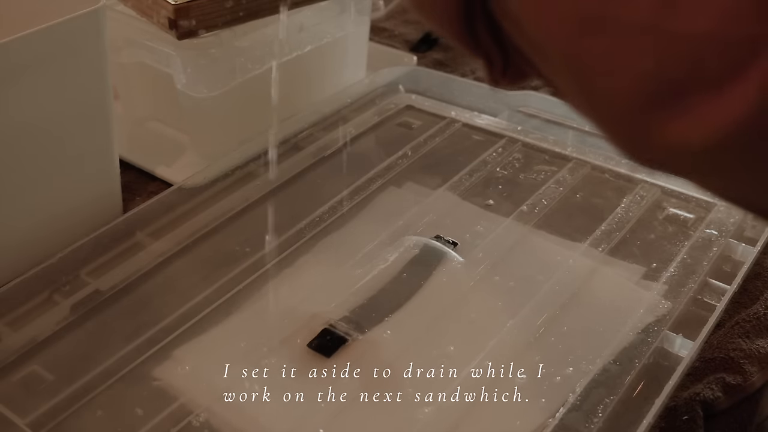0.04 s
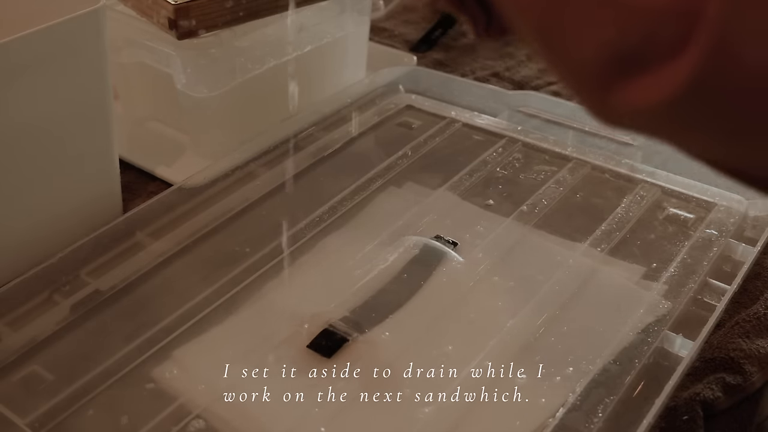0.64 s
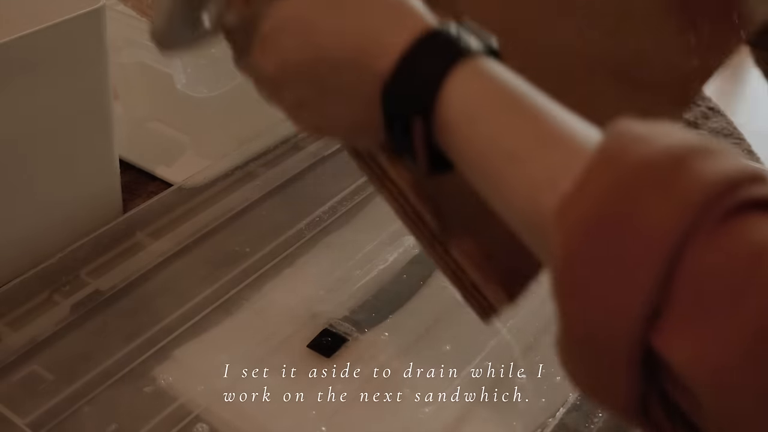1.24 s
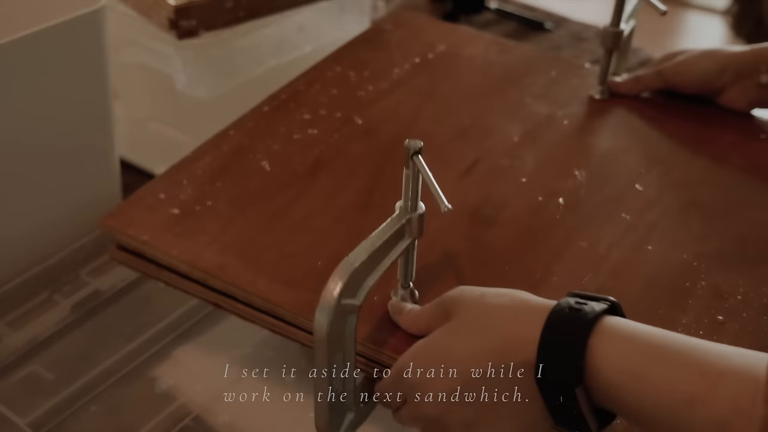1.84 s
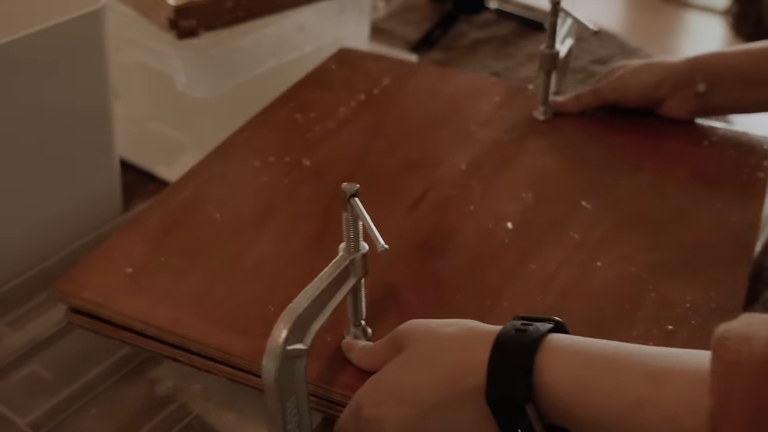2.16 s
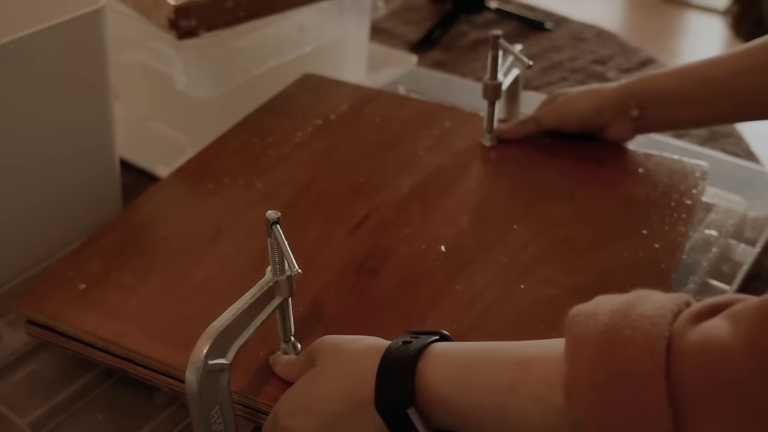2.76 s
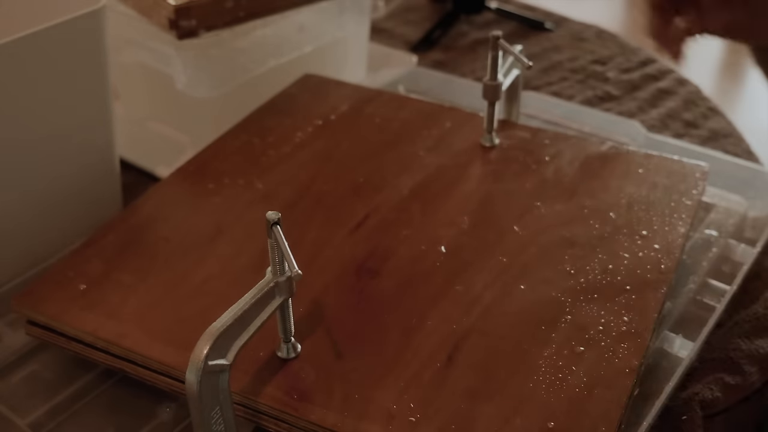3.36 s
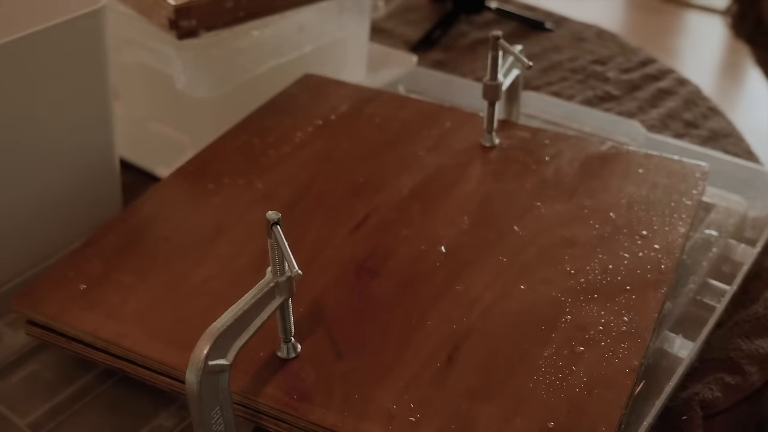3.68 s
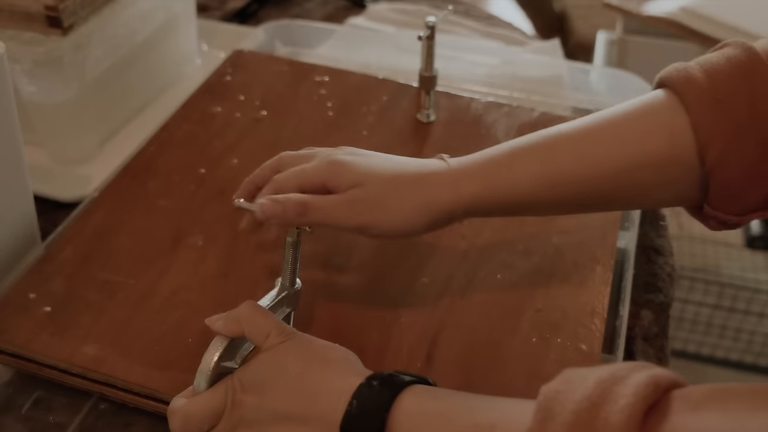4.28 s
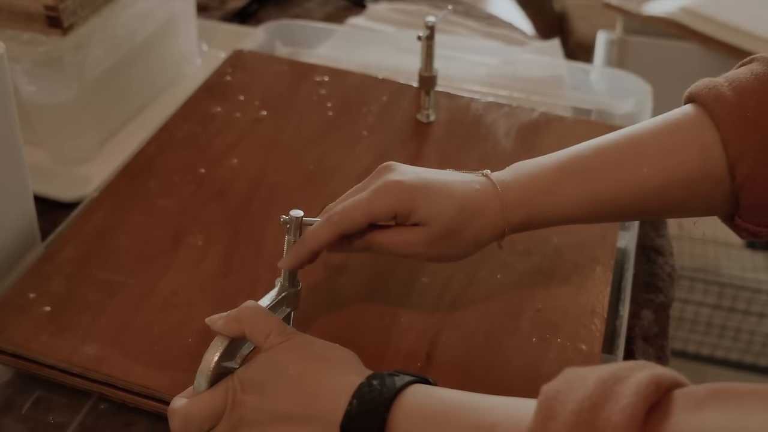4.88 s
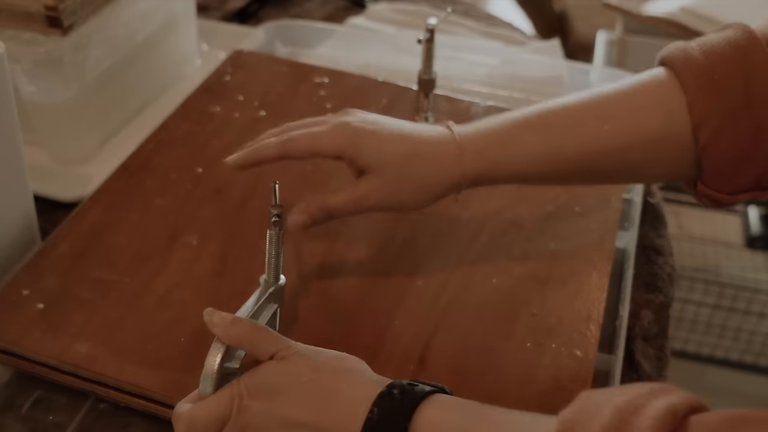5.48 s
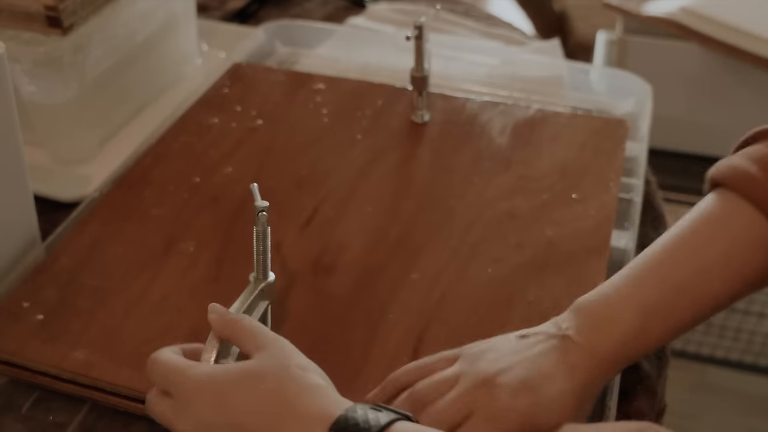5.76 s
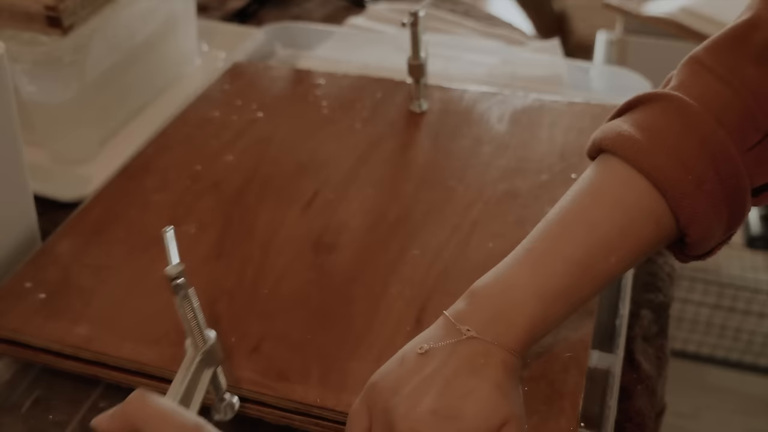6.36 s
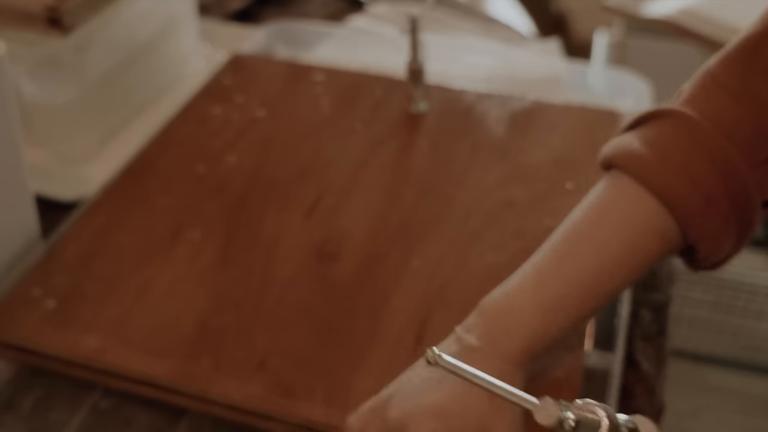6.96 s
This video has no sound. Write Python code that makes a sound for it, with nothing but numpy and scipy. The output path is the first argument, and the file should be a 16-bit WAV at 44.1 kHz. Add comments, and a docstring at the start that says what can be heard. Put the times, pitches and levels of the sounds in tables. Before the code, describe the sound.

Water patters into a plastic tray and stops, then a wooden board knocks down and a metal clamp is unscrewed and clatters off.

```python
"""Water runs off a wet stack, patters into a plastic tray and thins out: drops drum on the plastic,
splash in the puddle and trap ringing bubbles. A wooden press board held by steel clamps is set down
on the tray and knocks as it settles. A clamp screw is turned loose in gritty slips; the clamp knocks,
judders off the board's edge and is put down.
Heard in a small, lively workshop, on a closely spaced microphone pair."""
import sys
import numpy as np
from scipy import signal
from scipy.fft import rfft, irfft, next_fast_len
from scipy.io import wavfile
from scipy.ndimage import uniform_filter1d

SR = 44100
rng = np.random.default_rng(int(sys.argv[2]) if len(sys.argv) > 2 else 0)


def digitize_waveform(pressure):
    """Quantize a signal to 16-bit integers and store it at the path in sys.argv[1].

    Rows of a 2-D input are taken as channels; values are limited to [-1, 1].
    """
    field = np.atleast_2d(pressure).T
    bounded = np.clip(field, -1, 1)
    quanta = np.round(bounded * 32767).astype(np.int16)
    wavfile.write(sys.argv[1], SR, quanta)


N = 318843
WATER_SAMPLES = 2 * SR  # the water has stopped by then

# resonances of the plastic tray: pitch_hz, width_hz, level_db
TRAY_MODES = [(289, 42, 18.5), (339, 23, 14.5), (425, 110, 0.5), (585, 59, 5), (855, 120, -9),
              (1160, 93, -18.5), (2200, 550, -42)]
# drops that land in the puddle: start_s, level_db, centre_hz
PUDDLE_DROPS = [(.005, -51, 13700), (0.0339, -47, 8500), (0.0406, -51, 8600), (0.0817, -54, 8900),
                (0.26, -50.5, 9400), (0.2948, -49.5, 4940), (0.306, -53, 6000), (.321, -51, 11900),
                (0.3632, -61, 6460), (.387, -60, 9000), (.538, -64, 10000), (0.4336, -49.5, 4600),
                (0.4514, -42.5, 10400), (0.479, -63, 10900), (0.4976, -55, 8900), (0.578, -50.5, 9550),
                (0.7, -52, 12400), (0.7303, -51, 8800), (0.759, -48, 9600), (0.7655, -65, 9500),
                (0.786, -66, 10300), (1.059, -66, 12600), (1.085, -60, 8900), (1.104, -58, 6460),
                (1.294, -66, 13300), (1.353, -64, 12400), (1.372, -62, 6000)]
# strength of the stream as it runs dry: time_s, flow_db
STREAM_FLOW = [(0, 1.5), (.23, -3), (.5, -0.5), (.8, -5.5), (1.02, -2), (1.16, -10.5), (1.29, -12),
               (1.4, -22), (1.6, -5.5)]


def amp(db):
    """Decibels as an amplitude factor."""
    return 10 ** (np.asarray(db) / 20)


def unit(x):
    """x scaled to rms 1."""
    return x / np.sqrt(np.mean(x ** 2) + 1e-20)


def burst(x):
    """A short sound scaled to the energy of 10 ms at rms 1."""
    return x / np.sqrt(np.sum(x ** 2) / len(x) / (SR / 100))


def along(points, hz):
    """A curve of (freq_hz, value) points, read on a log frequency axis."""
    freqs, values = np.transpose(points)
    return np.interp(np.log(hz + 1), np.log(freqs + 1), values)


def hump(hz, centre_hz, octaves=0.42):
    """A bell of height 1 around one pitch."""
    return np.exp(-(np.log2((hz + 1) / centre_hz) / octaves) ** 2)


def add(track, s, sound):
    """Mix a sound in at time s."""
    part = track[..., max(round(s * SR), 0):][..., :sound.shape[-1]]
    part += sound[..., :part.shape[-1]]


def filtered(x, response):
    """x through a complex frequency response."""
    size = next_fast_len(x.shape[-1] + min(x.shape[-1] // 4, SR // 10), True)
    return irfft(rfft(x, size) * response(np.fft.rfftfreq(size, 1 / SR)), size)[..., :x.shape[-1]]


def shaped(x, spectrum):
    """x through a curve of (freq_hz, gain_db) points."""
    return filtered(x, lambda hz: amp(along(spectrum, hz)))


def coloured(x, db_of_hz, size=4096):
    """x through a causal, minimum-phase filter with the given dB curve."""
    cepstrum = irfft(np.log(amp(db_of_hz(np.fft.rfftfreq(size, 1 / SR))) + 1e-6))
    cepstrum[1:size // 2] *= 2
    cepstrum[size // 2 + 1:] = 0
    impulse = irfft(np.exp(rfft(cepstrum)))
    return signal.fftconvolve(x, impulse[None], axes=1)[:, :x.shape[1]]


def resonant(x, modes):
    """x through (pitch_hz, width_hz, level_db) resonances."""
    return filtered(x, lambda f: sum(amp(db) * 1j * f * width / (hz * hz - f * f + 1j * f * width)
                                     for hz, width, db in modes))


def even(x, bins=21):
    """A short burst with its broad spectral humps and holes levelled out."""
    power = np.abs(uniform_filter1d(np.mean(np.abs(rfft(x)) ** 2, axis=0), bins))
    hz = np.fft.rfftfreq(x.shape[1], 1 / SR)
    levelling_db = lambda f: -10 * np.log10(np.interp(f, hz, power / power.mean()) + .02)
    return burst(coloured(x, levelling_db, size=1024))


def swells(rows):
    """Bell-shaped envelopes from (centre_s, level_db, length_s) rows."""
    t = np.arange(N) / SR
    coarse = t[::64]
    bells = sum(amp(db) * np.exp(-2 * ((coarse - s) / length * 2) ** 2) for s, db, length in rows)
    return np.interp(t, coarse, bells)


def pushes(rows, t, rise_s=0.0015, release_s=0.028):
    """Envelopes that bite, hold and let go, from (start_s, level_db, length_s) rows."""
    return sum(amp(db) * np.interp(t, s + np.cumsum([0, rise_s, length, release_s]), [0, 1, 1, 0])
               for s, db, length in rows)


def grains(per_s, spread_db):
    """Impulses at random times with random sizes and directions."""
    hits = rng.random(N) < per_s / SR
    size = hits * amp(spread_db * np.clip(rng.standard_normal(N), -2, 2)) * rng.choice([-1, 1], N)
    pan = rng.uniform(-0.083, 0.12, N)
    return size * np.array([1 + pan, 1 - pan])


def diffuse(size):
    """Noise from all sides: alike at both microphones in the bass, unrelated in the treble."""
    # stereo width of diffuse sound: freq_hz, side_to_mid_db
    width = [(40, -34), (150, -20.5), (350, -14), (700, -8.5), (1400, -4.5), (2800, 0.5), (15000, -1.5)]

    def shares(hz):
        side_gain = amp(along(width, hz))
        return np.array([np.ones_like(hz), side_gain]) / np.hypot(1, side_gain)
    mid, side = filtered(rng.standard_normal((2, size)), shares)
    return np.array([mid + side, mid - side])


def in_room(x, wet_db, build_s=0.00039):
    """The direct sound and the workshop's tail, in which each frequency dies at its own speed."""
    # reverberation time of the workshop: freq_hz, t60_s
    decay = [(100, 0.44), (400, 0.63), (1100, 0.66), (4000, 0.72), (9000, 0.42), (16000, 0.45)]
    # strength of the walls' answer: freq_hz, gain_db
    walls = [(100, 2), (300, -2), (600, 3), (1050, 1), (2000, 0), (5000, 1), (9000, 6.5), (15000, 6.5)]
    hz, t, spectra = signal.stft(diffuse(SR // 2), SR, nperseg=256)
    spectra = spectra * amp(-60 * t / along(decay, hz)[:, None]) * (1 - np.exp(-t / build_s))
    tail = signal.istft(spectra, SR, nperseg=256)[1]
    response = amp(wet_db) * coloured(tail / np.linalg.norm(tail[0]), lambda f: along(walls, f))
    response[:, 0] += 1  # the direct path
    return signal.fftconvolve(x, response, axes=1)


def room_tone(floor_db=-60):
    """Steady rumble and hiss with a faint, wavering hum; the hiss swells twice."""
    # spectrum of the quiet workshop: freq_hz, density_db
    floor = [(18, -30), (25, -38), (33, -37), (45, -33), (62, -21), (88, -6), (112, -19), (165, -12.5),
             (260, -13.5), (400, -17.5), (560, -19), (1000, -23), (2000, -27.5), (3800, -32), (5500, -31.5),
             (11000, -36.5), (16000, -42)]
    # narrow bands of hum: pitch_hz, level_db
    hum_bands = [(45, -62.5), (139, -67.5)]
    # soft swells of hiss: centre_s, level_db, length_s
    swishes = [(3.66, -62, 0.71), (5.77, -59.5, 0.16)]
    air = unit(shaped(diffuse(N), floor))
    hum = sum(amp(db) * unit(resonant(rng.standard_normal(N), [(hz, 6, 0)])) for hz, db in hum_bands)
    hiss = unit(shaped(rng.standard_normal((2, N)), [(500, 1), (3000, -2), (11000, -3.5), (16000, -10)]))
    return amp(floor_db) * air + hum + swells(swishes) * hiss


def grip(rise_s=0.00094, t60_s=0.062):
    """A soft hand wakes only one low mode of the board."""
    # bumps of the hand on the board: start_s, pitch_hz, level_db
    bumps = [(3.817, 323, -32.5), (3.847, 347, -40), (6.822, 315, -44.5), (7.013, 330, -37)]
    out, t = np.zeros((2, N)), np.arange(SR // 5) / SR
    for s, hz, db in bumps:
        envelope = amp(db - 60 * t / t60_s) * (1 - np.exp(-t / rise_s))
        add(out, s, envelope * np.sin(2 * np.pi * hz * t))
    return in_room(out, wet_db=-6)[:, :N]


def clack(hz, rattle_t60_s=0.026, board_db=-13, width_ratio=0.76):
    """A tiny rattle rings one broad resonance, with a little of the board below it."""
    t = np.arange(SR // 16) / SR
    rattle = even(diffuse(len(t)) * amp(-60 * t / rattle_t60_s))
    body = [(hz, hz * width_ratio, 0), (750, 400, board_db)]
    ring = resonant(resonant(rattle, body), body)
    return burst(coloured(ring, lambda f: -10 * np.log10(1 + (f / (1.4 * hz)) ** 8)))


def ticks():
    """Small ticks: light steel ticks as the clamps are moved, and one faint, dry, high click."""
    # small ticks: start_s, level_db, ring_hz
    small_ticks = [(1.819, -60, 1800), (3.43, -61, 8600), (5.225, -53, 1570), (5.2996, -57, 930),
                   (5.405, -61, 2190), (5.7778, -51.5, 1670), (6.2315, -51, 5800), (6.237, -38, 2060),
                   (6.241, -53, 6100), (6.261, -47, 1670), (6.817, -58.5, 1700), (6.829, -51.5, 1620),
                   (7.029, -43, 1620)]
    out = np.zeros((2, N))
    for s, db, hz in small_ticks:
        add(out, s, amp(db) * clack(hz))
    return in_room(out, wet_db=-3)[:, :N]


def handle(contacts_per_s=2500, waver_hz=130):
    """The loose handle scrapes through its hole and sings a thin, wavering note."""
    # slides of the handle: centre_s, level_db, length_s, ring_hz, scrape_db
    slides = [(3.883, -62, 0.014, 10000, 5.5), (3.896, -62, 0.022, 9700, 0), (4.467, -68, 0.008, 9800, 4),
              (4.492, -62.5, 0.015, 9700, 0), (4.512, -70, 0.018, 9930, -8), (5.55, -66, 0.012, 9500, 10),
              (6.205, -65, 0.019, 9800, 7), (6.245, -51.5, 0.008, 9680, 13), (6.272, -49.5, 0.02, 9600, -6),
              (6.273, -50, 0.022, 5710, -10), (6.386, -62.5, 0.036, 6950, 8)]
    # spectrum of its scrape: freq_hz, density_db
    scrape_spectrum = [(1000, -30), (3500, 1), (6000, -3), (8600, -7), (11000, -14), (16000, -21)]
    out, t = np.zeros((2, N)), np.arange(SR // 5) / SR
    for s, db, length, ring_hz, scrape_db in slides:
        contacts = rng.standard_normal((2, len(t))) * (rng.random(len(t)) < contacts_per_s / SR)
        scrape = unit(shaped(contacts, scrape_spectrum))
        unsteady = unit(filtered(rng.standard_normal(len(t)), lambda hz: hz < 400))
        phase = 2 * np.pi * np.cumsum(ring_hz + waver_hz * unsteady) / SR
        ring = unit(np.sin(phase + rng.uniform(-1.1, 1, (2, 1))))
        envelope = amp(db) * np.exp(-2 * (2 * (t / length - 2)) ** 2)
        add(out, s - 2 * length, envelope * (ring + amp(scrape_db) * scrape))
    return in_room(out, wet_db=-7)[:, :N]


def screw(thread_db=1, rub_db=3.5, rasp_db=-3, catches_per_s=95, slip_s=0.0038):
    """Steel catches and slips: each turn rings the frame at its own pitch, rubs on wood are duller."""
    # spectrum of the slipping thread: freq_hz, density_db
    thread = [(150, -6.5), (250, -1), (312, 4.5), (455, -2), (650, -7.5), (1350, -4), (2200, -10.5),
              (3100, -21), (5920, -28.5), (9100, -50), (15400, -120)]
    # resonances of screw and frame: pitch_hz, width_hz, level_db
    rasp_modes = [(700, 250, 1), (844, 87, -5), (950, 56, -6), (1170, 63, -5), (1317, 60, -2),
                  (1880, 90, -3.5), (1980, 80, -5), (2220, 66, -4)]
    # turns of the screw: start_s, level_db, length_s, pitch_hz, lift_db
    turns = [(3.87, -52.5, 0.028, 1540, 4), (4.074, -55, 0.06, 2200, 0), (4.25, -55.5, 0.046, 1100, 4),
             (4.383, -54.5, 0.019, 1950, 0), (4.437, -53, 0.017, 720, 0), (4.452, -59, 0.013, 1970, 8),
             (4.479, -56.5, 0.017, 1350, 14), (4.571, -55.5, 0.0074, 800, 10), (4.661, -54, 0.03, 700, 4)]
    # the loose clamp rubs on the board: start_s, level_db, length_s
    rubs = [(5.55, -58, 0.014), (6.195, -56, 0.022), (6.28, -55, 0.051), (6.35, -49, 0.031),
            (6.96, -58, 0.062)]
    t = np.arange(N) / SR
    catches = np.r_[0, np.cumsum(rng.uniform(.4, 1.6, 1500)) / catches_per_s]
    since_catch = t - catches[np.searchsorted(catches, t, "right") - 1]
    grit = grains(per_s=4000, spread_db=1) * (.4 + np.exp(-since_catch / slip_s))
    slips = unit(shaped(grit, thread))
    rasp = slips + amp(rasp_db) * unit(resonant(slips, rasp_modes))
    out = amp(rub_db) * pushes(rubs, t) * slips
    for s, db, length, hz, lift_db in turns:
        span = slice(round(s * SR), round(s * SR) + SR // 6)
        turn = unit(coloured(rasp[:, span], lambda f: lift_db * hump(f, hz)))
        add(out, s, amp(thread_db) * pushes([(s, db, length)], t[span]) * turn)
    return in_room(out, wet_db=0)[:, :N]


def clinks(snap_t60_s=0.0018, snap_db=3):
    """Steel meets steel with a bright snap and the frame rings briefly in the hand."""
    # modes of the clamp's frame: pitch_hz, level_db, t60_s
    frame_modes = [(1980, 1.5, 0.04), (2600, -3.5, 0.067), (2800, -3, 0.07), (3900, -6, 0.045),
                   (4370, -1.5, 0.045), (5710, -15, 0.07)]
    # the screw strikes the frame: start_s, level_db
    strikes = [(6.235, -36.5), (6.2625, -41)]
    out, t = np.zeros((2, N)), np.arange(SR // 5) / SR
    hz, mode_db, t60 = np.transpose(frame_modes)[:, :, None, None]
    for s, db in strikes:
        phase = rng.normal(0, 0.66, (len(frame_modes), 2, 1))
        ring = np.sum(amp(mode_db - 60 * t / t60) * np.sin(2 * np.pi * hz * t + phase), axis=0)
        snap = rng.standard_normal((2, len(t))) * amp(snap_db - 60 * t / snap_t60_s)
        add(out, s, amp(db) * (ring + snap))
    return in_room(out, wet_db=-5)[:, :N]


def groan(pitch_hz=505, waver=0.019, overtone_db=-11):
    """Stick and slip lock on to one resonance of the board: a short, rough tone."""
    # groans under the dragging clamp: centre_s, level_db, length_s
    groans = [(6.3, -42, 0.014), (6.368, -36.5, 0.069)]
    unsteady = unit(filtered(rng.standard_normal(N), lambda hz: hz < 150))
    phase = 2 * np.pi * np.cumsum(pitch_hz * (1 + waver * unsteady)) / SR
    tone = swells(groans) * (np.sin(phase) + amp(overtone_db) * np.sin(2 * phase))
    return in_room(np.array([tone, tone]), wet_db=-20)[:, :N]


def flow_db(s):
    """Strength of the stream at times s; dry after the last point."""
    return np.interp(s, *np.transpose(STREAM_FLOW), right=-120)


def plink(hz, cycles, side):
    """A water film snaps and a tiny bubble rings, rising; the microphones hear it side cycles apart."""
    turn = hz * np.arange(SR // 125) / SR
    phase = 2 * np.pi * (turn * (1 + 0.022 * turn / cycles) + np.array([[0], [side]]))
    ring = np.sin(phase) * amp(-60 * turn / cycles) * (1 - np.exp(-2 * turn))
    snap = np.zeros_like(ring)
    snap[:, :3] = [1, -2, 1]
    return burst(burst(ring) + .3 * burst(snap))


def tap(bright_db, t60_s=0.04, roughness=0.11):
    """A drop taps the tray floor; a direct hit lifts the higher resonances by bright_db an octave."""
    t = np.arange(SR // 8) / SR
    modes = [(hz, width, db + bright_db * np.log2(hz / TRAY_MODES[0][0]))
             for hz, width, db in TRAY_MODES]
    impact = (t == 0) + roughness * diffuse(len(t)) * amp(-60 * t / t60_s)
    return burst(resonant(impact, modes))


def splash(hz, cycles=22, satellites=4, satellite_db=-6, satellite_s=0.0071, mist_db=-11, mist_t60_s=.03):
    """A drop bursts with one sharp plink, a few weaker ones behind it and a faint puff of mist."""
    t = np.arange(SR // 16) / SR
    film = [(hz, hz, 0)]
    mist = rng.standard_normal((2, len(t))) * amp(-60 * t / mist_t60_s)
    out = amp(mist_db) * burst(resonant(resonant(mist, film), film))
    add(out, 0, plink(hz, cycles, side=rng.uniform(-1.7, 1) / 4))
    for k, (late, size, pitch, side) in enumerate(rng.uniform(-0.92, 1, (satellites, 4))):
        pop = plink(hz * 2 ** (pitch / 4), .7 * cycles, side / 2)
        delay = satellite_s * (k + 1 + late / 2) / satellites
        add(out, delay, amp(satellite_db - 1.2 * k + 2 * size) * pop)
    return out


def fallback(t60_s=0.26, rise_s=0.015):
    """Envelope of the spray that each splash throws up and that rains back."""
    level, t = np.zeros(WATER_SAMPLES), np.arange(SR // 2) / SR
    for s, db, _ in PUDDLE_DROPS:
        add(level, s, amp(db - 60 * t / t60_s) * (1 - np.exp(-t / rise_s)))
    return level


def trickle(drops_per_s=46, drum_db=-58.5, spray_db=-66, spray_grows=3, fallback_db=-20, spread_db=4):
    """The thin stream breaks into nearly regular drops that drum on the tray, with fine spray above."""
    # spectrum of the spray: freq_hz, density_db
    spray_spectrum = [(880, -30), (1500, 9), (3090, 3.5), (4640, -6), (6890, 1), (9370, -5), (16000, -1)]
    train, droplets = np.zeros((2, 2, WATER_SAMPLES))
    for k, (late, size) in enumerate(rng.uniform(-1, 1, (100, 2))):
        add(train, (k + .3 * late) / drops_per_s, amp([spread_db * size]))
    for when, size, pitch, side in rng.random((900, 4)):
        droplet = plink(1500 + 13500 * pitch, cycles=6.2, side=side - .5)
        add(droplets, when * STREAM_FLOW[-1][0], amp(12 * size ** 4) * droplet)
    # the water film cushions each drop
    drum = filtered(resonant(train, TRAY_MODES), lambda hz: 1 / (1 + 1j * hz / 3500))
    spray = shaped(droplets, spray_spectrum)
    drum, spray = (x / np.sqrt(np.mean(x[:, :SR] ** 2)) for x in (drum, spray))
    flow = flow_db(np.arange(WATER_SAMPLES) / SR)
    spraying = amp(spray_db + spray_grows * flow) + amp(fallback_db) * fallback()
    return in_room(amp(drum_db + flow) * drum + spraying * spray, wet_db=-1)[:, :N]


def spatter(start_s=0.24, end_s=0.73, level_db=-55, spread_db=16, count=110):
    """Stray droplets tick sharply all over the tray while the splashing is at its height."""
    out = np.zeros((2, WATER_SAMPLES))
    for when, size, pitch, side in rng.random((count, 4)):
        s = start_s + when * (end_s - start_s)
        droplet = plink(3000 + 12000 * pitch, cycles=5, side=side - .5)
        add(out, s, amp(level_db + flow_db(s) - spread_db * size) * droplet)
    return in_room(out, wet_db=-21)[:, :N]


def bubbles(cycles=34, bend=0.03, splash_db=-4):
    """A drop breaks the surface with a little splash; the trapped bubble rings a short, rising note."""
    # drops that trap a bubble: start_s, level_db, pitch_hz
    trapped = [(0.107, -69, 5400), (.2643, -58, 3450), (0.2706, -58, 4300), (.339, -64, 5400),
               (.392, -58, 4760), (0.573, -59, 3550), (0.58, -58, 3680), (.739, -59.5, 4270),
               (.744, -64, 4760), (1.6825, -59, 2220)]
    out, t = np.zeros((2, WATER_SAMPLES)), np.arange(SR // 20) / SR
    for s, db, hz in trapped:
        turn = hz * t
        envelope = amp(-60 * turn / cycles) * (1 - np.exp(-turn))
        ring = envelope * np.sin(2 * np.pi * turn * (1 + bend * turn / cycles))
        add(out, s, amp(db) * burst(ring[None]))
        add(out, s, amp(db + splash_db) * burst(splash(hz)))
    return in_room(out, wet_db=-6)[:, :N]


def spills(drops_per_s=75, fade_db_per_s=70, spread_db=2, count=12):
    """A spill lands as a quick run of fading drops."""
    # last spills on the bare tray floor: start_s, level_db
    last_spills = [(1.082, -63.5), (1.197, -52)]
    out = np.zeros((2, WATER_SAMPLES))
    for s, db in last_spills:
        for k, (late, size) in enumerate(rng.uniform(-0.87, 1, (count, 2))):
            delay = (k + .3 * late) / drops_per_s
            add(out, s + delay, amp(db - fade_db_per_s * delay + spread_db * size) * tap(bright_db=4))
    return in_room(out, wet_db=-5)[:, :N]


def drops(small_per_s=28, small_tap_db=-59, small_splash_db=-63, splash_grows=1.6, small_hz=6500):
    """Big drops splash in the puddle or hit the tray; small ones between them weaken with the flow."""
    # drops on the bare tray floor: start_s, level_db
    bare_hits = [(0.066, -51), (0.079, -47), (0.1051, -46), (.147, -51), (0.1985, -48), (0.638, -66),
                 (.669, -54.5), (.880, -53), (1.241, -59)]
    # heavy drops that drum through the film of water: start_s, level_db
    plops = [(0.404, -50.5), (.521, -50), (0.544, -52), (0.603, -56), (0.638, -50), (.78, -51), (.856, -50),
             (1.082, -51.5), (1.197, -54.5)]
    out = np.zeros((2, WATER_SAMPLES))
    for s, db, hz in PUDDLE_DROPS:
        add(out, s, amp(db) * splash(hz))
    for s, db in bare_hits:
        add(out, s, amp(db) * tap(bright_db=13))
    for s, db in plops:
        add(out, s, amp(db) * tap(bright_db=-12))
    for k, (late, size, pitch) in enumerate(rng.uniform(-1, 1, (44, 3))):
        s = (k + .5 + .4 * late) / small_per_s
        size_db, hz = -5 * size, small_hz * 2 ** (.7 * pitch)
        add(out, s, amp(small_tap_db + flow_db(s) + size_db) * tap(bright_db=17.5))
        add(out, s, amp(small_splash_db + splash_grows * flow_db(s) + size_db) * splash(hz))
    return in_room(out * amp([[-.6], [.6]]), wet_db=-9)[:, :N]  # a little to the right


def blow(tilt, cutoff_hz, thud_db, spot_hz, spot_db, crack_t60_s=0.0079, clatter_t60_s=0.069):
    """Struck wood cracks, clatters and rings; soft contacts lose their treble, heavy ones thud."""
    # modes of the board on its tray: pitch_hz, level_db, t60_s
    board_modes = [(150, -22, 0.12), (294, -5, 0.04), (335, -3, 0.03), (440, -7, 0.045), (492, -7, 0.04),
                   (620, -9, 0.03), (738, -5, 0.03), (825, -6, .035), (990, -5, 0.025), (1186, -4, 0.035),
                   (1238, -6, 0.035), (1310, -9, 0.035), (1981, -14, 0.035), (2550, -9, 0.015),
                   (4400, -25.5, 0.02)]
    # spectrum of the contact noise: freq_hz, density_db
    contact_spectrum = [(50, -35.5), (110, -8), (260, -2.5), (700, 0.5), (1200, -6.5), (1600, -3),
                        (2700, -9.5), (5000, -17.5), (9000, -17.5), (16000, -18)]
    t = np.arange(SR // 7) / SR
    mode_hz, mode_db, mode_t60 = np.transpose(board_modes)[:, :, None]
    # the modes answer differently at each spot
    strength_db, detune, sign = rng.standard_normal((3, len(board_modes), 1))
    envelopes = np.sign(sign) * amp(mode_db + strength_db - 60 * t / mode_t60)
    ring = np.sum(envelopes * np.sin(2 * np.pi * mode_hz * (1 + 0.0034 * detune) * t), axis=0)
    crack = even(rng.standard_normal((1, len(t))) * amp(-60 * t / crack_t60_s))
    clatter = even(diffuse(len(t)) * amp(-60 * t / clatter_t60_s))
    contact = coloured(amp(-2) * crack + amp(-5) * clatter, lambda f: along(contact_spectrum, f))

    def colour_db(f):
        slope = tilt * np.log2(np.clip(f, 300, 5000) / 1000)
        softness = 10 * np.log10(1 + (f / cutoff_hz) ** 7)
        weight = along([(40, -29), (90, 4.5), (150, thud_db), (270, 1.5), (500, 1)], f)
        return slope - softness + weight + spot_db * hump(f, spot_hz)
    return burst(coloured(burst(contact) + amp(-2) * burst(ring[None]), colour_db))


def drag(catches_per_s=77, scatter_s=0.00083, swell_db=4):
    """The clamp sticks and slips, hardest in mid-stroke; each catch is a soft blow on the board."""
    # the clamp judders off the board's edge: start_s, length_s, level_db
    strokes = [(6.337, 0.047, -39)]
    out = np.zeros((2, N))
    for start, length, db in strokes:
        for s in np.arange(start, start + length, 1 / catches_per_s):
            catch = blow(tilt=-3, cutoff_hz=1900, thud_db=-5, spot_hz=1050, spot_db=3)
            level_db = db + swell_db * np.sin(np.pi * (s - start) / length)
            add(out, s + scatter_s * rng.standard_normal(), amp(level_db) * in_room(catch, wet_db=-8.5))
    return out


def knocks():
    """The board settles and rocks on the tray, one blow at a time."""
    # the board meets the tray: start_s, level_db, tilt_db_per_octave, cutoff_hz, thud_db, room_db,
    # spot_pitch_hz, spot_lift_db
    landings = [(2.7004, -30, -5, 7040, -6, -5, 1160, -5), (2.7784, -31.5, 0.5, 4960, -4, -6.5, 1070, 5.5),
                (3.017, -61.5, 6, 4490, 7, -2, 1480, -16), (4.6969, -46.5, 0, 2400, 3, -3, 960, 7.5),
                (4.9957, -54, -5.5, 3000, 5, -1.5, 690, 1), (5.0812, -53.5, 3.5, 5050, 13, -12, 720, 15),
                (5.9419, -34.5, -5, 1590, -2, -6.5, 1050, 3.5), (6.0736, -38, -2, 2800, 0, -2.5, 694, 1),
                (6.483, -32, -4, 2600, -11, -6.5, 730, 5)]
    out = np.zeros((2, N))
    for s, db, tilt, cutoff_hz, thud_db, room_db, spot_hz, spot_db in landings:
        add(out, s, amp(db) * in_room(blow(tilt, cutoff_hz, thud_db, spot_hz, spot_db), room_db))
    return out


def clamp_blows(rebounds=3, first_gap_s=0.0065, gap_grows=1.5, loss_db=1):
    """Steel clacks as the clamp strikes the wood, then rattles on in thinner, ever wider rebounds."""
    # a clamp strikes the board: start_s, level_db, tilt_db_per_octave, cutoff_hz, thud_db,
    # spot_pitch_hz, spot_lift_db, clack_db, clack_hz, rebound_db
    strikes = [(2.581, -35.5, 5, 1900, 17.5, 1160, 2, -34.5, 2600, -10.5),
               (2.606, -30.5, -2.5, 8560, 1.5, 1520, -0.5, -44, 5030, -35),
               (5.5425, -46, 2, 2600, 18, 160, 8, -47.5, 1720, -16),
               (5.8096, -34, 2, 5400, 9, 1550, 1.5, -35.5, 3950, -15.5),
               (6.2245, -26.5, -2, 6350, -2, 1150, 1.5, -39, 4420, -17),
               (7.0396, -21.5, -1, 6200, -2, 920, 6.5, -29.5, 1840, -12)]
    out = np.zeros((2, N))
    for s, db, tilt, cutoff_hz, thud_db, spot_hz, spot_db, clack_db, clack_hz, rebound_db in strikes:
        add(out, s, amp(db) * in_room(blow(tilt, cutoff_hz, thud_db, spot_hz, spot_db), wet_db=-3))
        add(out, s, amp(clack_db) * in_room(clack(clack_hz), wet_db=-10.5))
        rattle = np.zeros((2, SR // 5))
        for k, delay in enumerate(np.cumsum(first_gap_s * gap_grows ** np.arange(rebounds))):
            rebound = blow(tilt + 5, 0.7 * cutoff_hz, thud_db=0, spot_hz=spot_hz, spot_db=spot_db)
            add(rattle, delay, amp(-loss_db * k) * rebound)
        add(out, s, amp(db + rebound_db) * in_room(rattle, wet_db=-1))
    return out


def scene():
    """Water, board and clamps over the tone of the workshop."""
    clamps = clamp_blows() + drag() + groan() + clinks() + ticks() + screw() + handle()
    out = knocks() + grip() + clamps + room_tone()
    add(out, 0, drops() + bubbles() + spatter() + trickle() + spills())
    return out


def record(dry):
    """The recorder keeps nothing above its band limit."""
    return filtered(dry, lambda hz: hz < 16200)


dry = scene()
out = record(dry)
digitize_waveform(out)
```